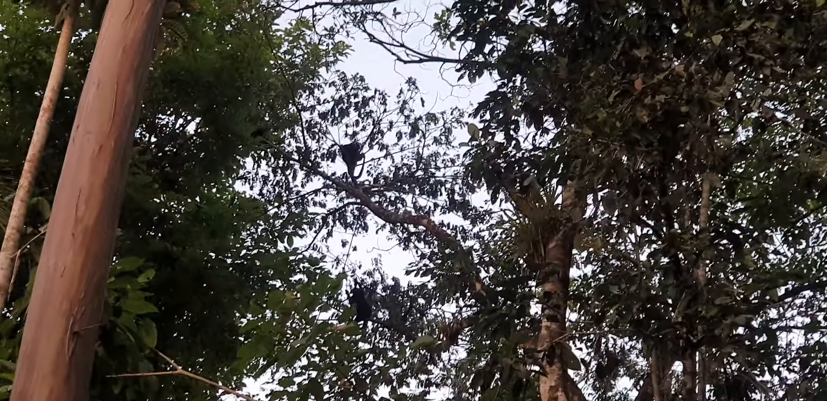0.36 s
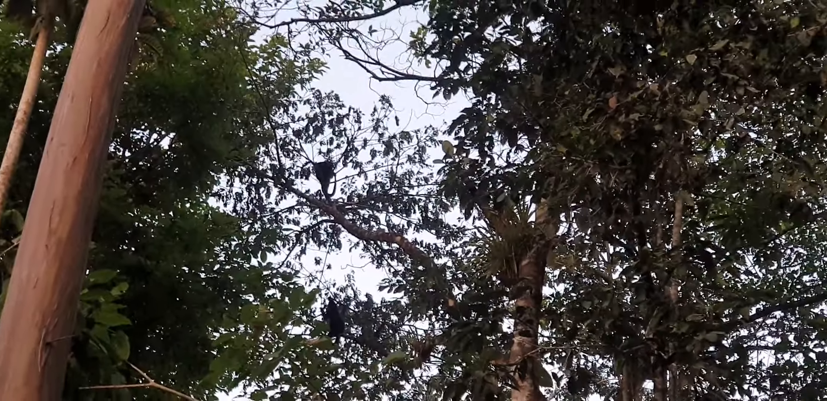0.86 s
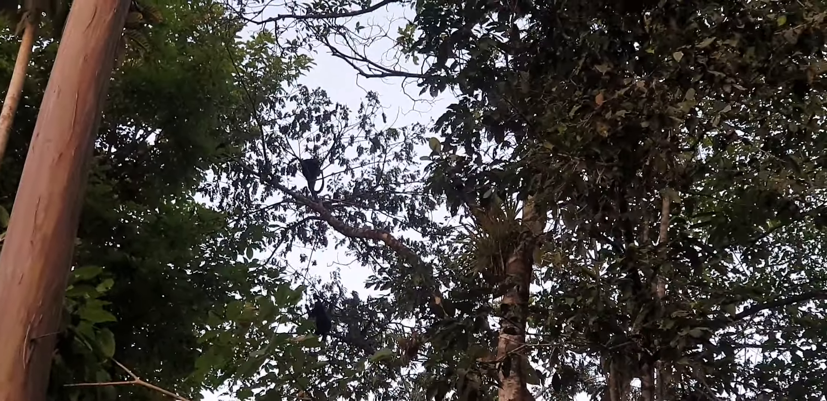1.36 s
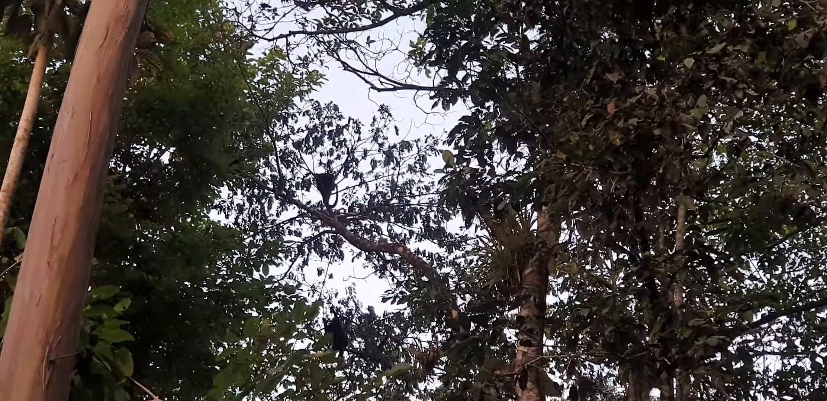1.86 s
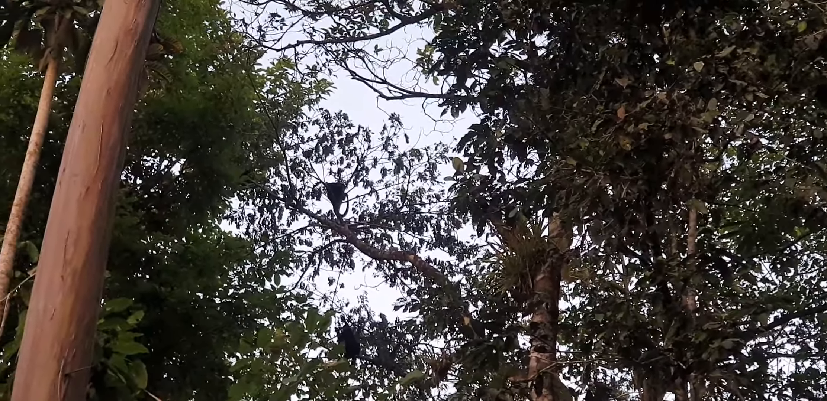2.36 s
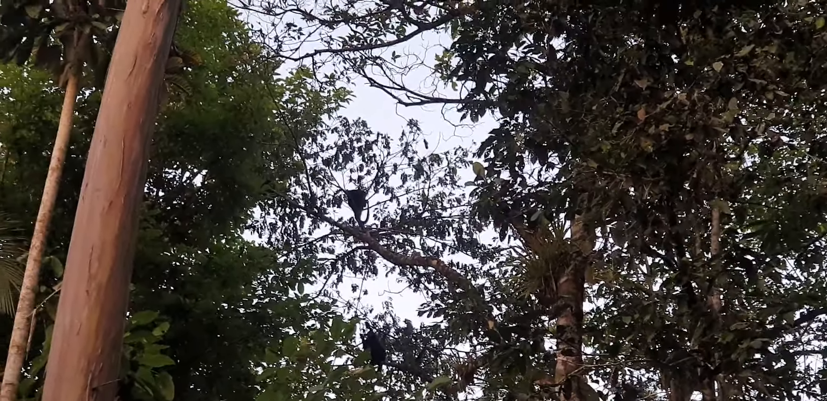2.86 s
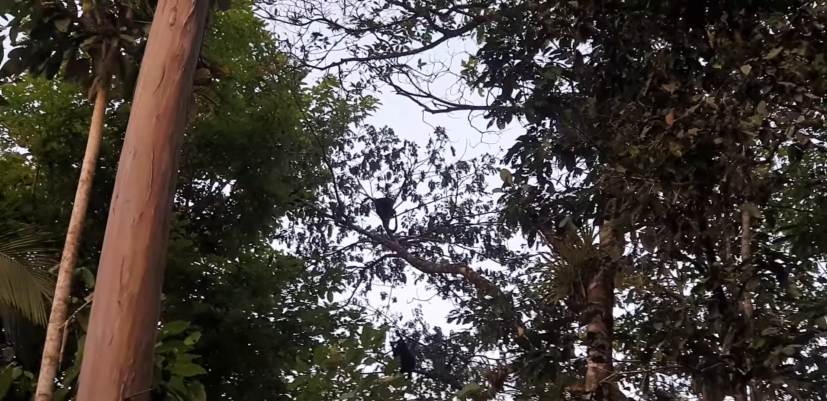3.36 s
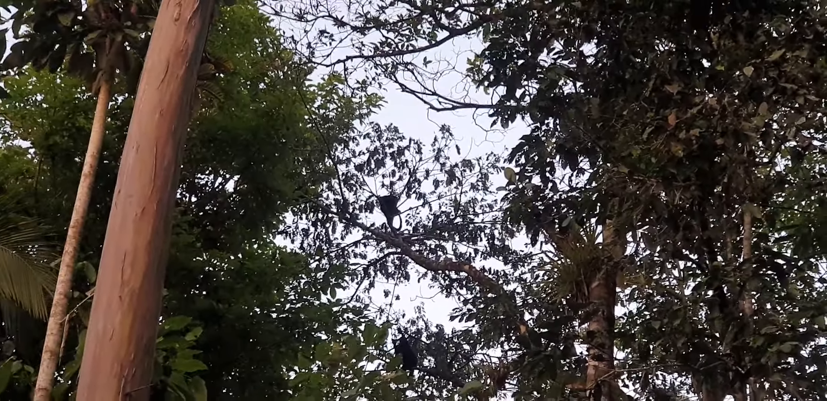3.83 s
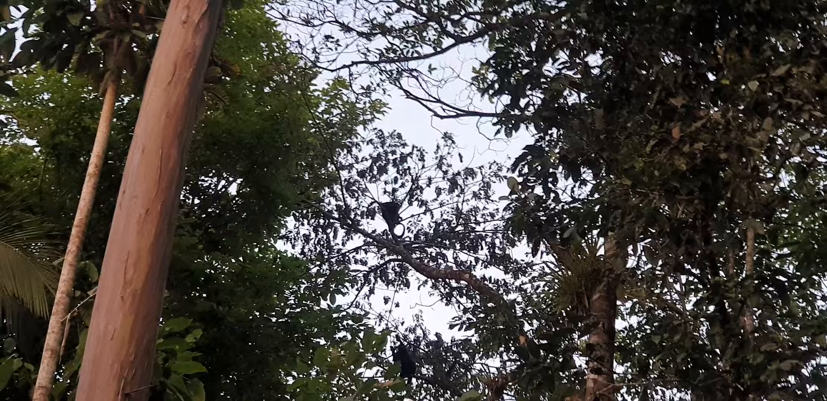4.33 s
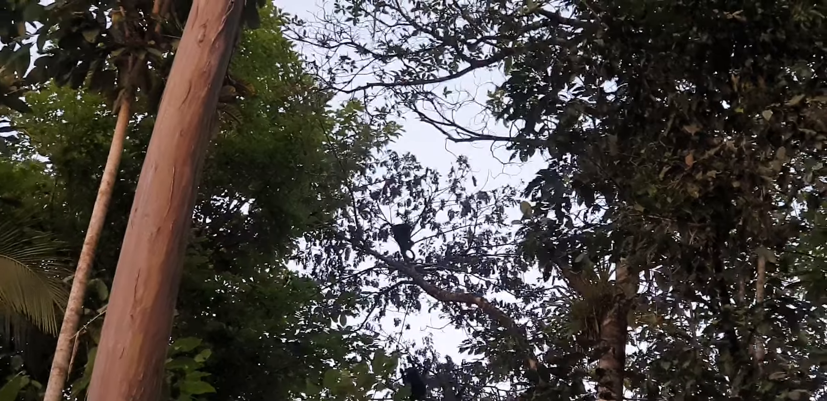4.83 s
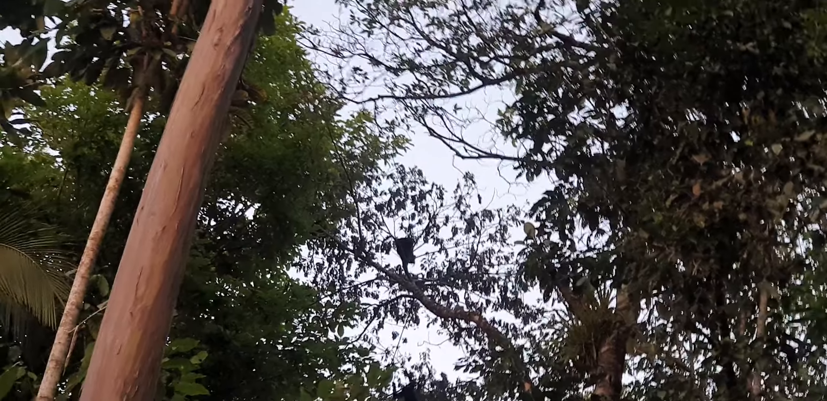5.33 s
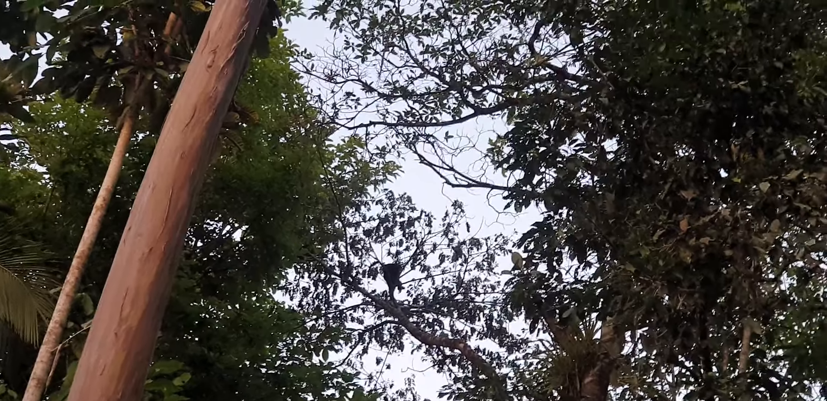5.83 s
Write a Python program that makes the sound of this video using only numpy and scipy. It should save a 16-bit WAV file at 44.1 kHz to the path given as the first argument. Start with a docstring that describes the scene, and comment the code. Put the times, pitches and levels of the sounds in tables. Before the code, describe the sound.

Shrill cicadas drone without pause over soft low forest noise, with brief insect rasps in the first three seconds. A far motor hums low and dull thumps recur. Distant birds whistle and chirp faintly, echoing among the trees, mostly left. Around four and a half seconds a finger rubs the microphone case and knocks sharply, very close and only on the left, then the calm drone continues.

```python
"""Forest by day

Cicadas and katydids drone as stroke-gated noise bands over the noise of the forest floor; insects rasp briefly.
A distant motor hums in harmonic orders, with slow dull thumps that ring two low modes.
Far birds whistle and chatter as gliding sines in the decaying-noise echo of the trees. A finger slips (grainy
noise) and raps (short pushes that ring case modes) on the case beside the left microphone."""
import sys
import numpy as np
from scipy import signal
from scipy.io import wavfile
from scipy.ndimage import uniform_filter1d, map_coordinates

SR = 44100
rng = np.random.default_rng(int(sys.argv[2]) if len(sys.argv) > 2 else 0)


def pcm_store(signal):
    """Save signal as 16-bit PCM."""
    levels = np.round(np.clip(np.atleast_2d(signal), -1, 1) * 32767)
    wavfile.write(sys.argv[1], SR, levels.astype(np.int16).T)


def makeup_ratio(level_db):
    """Linear amplitude ratio for a level in decibels (20 dB per factor of ten)."""
    decades = np.asarray(level_db, float) / 20
    return 10 ** decades


N = 273420  # length in samples


def unit(x):
    """Normalisation to an rms value of 1."""
    return x / np.sqrt(np.mean(x ** 2) + 1e-20)


def along(points, hz):
    """Interpolation of (f/Hz, value) points on a logarithmic frequency axis."""
    f, value = np.transpose(points)
    return np.interp(np.log(hz + 1), np.log(f + 1), value)


def curves(rows):
    """Linear interpolation in time: one value per sample for each column after t/s."""
    s, *columns = np.transpose(rows)
    return [np.interp(np.arange(N) / SR, s, column) for column in columns]


def wobble(rate):
    """Band-limited fluctuation: a smooth random curve through `rate` knots a second."""
    knots = rng.standard_normal(int(N * rate / SR) + 4)
    return map_coordinates(knots, [np.arange(N) * rate / SR])


def sides(db):
    """Interchannel level difference: left and right gains for a left-over-right value in dB."""
    return np.array([makeup_ratio(db / 2), makeup_ratio(-db / 2)])


# Left-right balance of all stereo noise: f/Hz, left over right level/dB
NOISE_BALANCE = [(60, 4), (200, 8), (380, 2.5), (700, 10.5), (2400, 2.5), (4400, 2.5), (6000, 2.5),
                 (10000, 7), (15000, .5)]


def rush(spectrum, alike, patchy_db):
    """Partially coherent noise: two independent noises mixed to a set correlation, rms 1, with random patches."""
    hz, _, z = signal.stft(rng.standard_normal((2, N)), SR, nperseg=2048)
    patches = uniform_filter1d(rng.standard_normal(z.shape[1:]), 12, 0)  # across frequency
    patches = unit(uniform_filter1d(patches, 3, 1))  # across time
    turn = np.arccos(np.clip(along(alike, hz), -1, 1))[:, None] / 2
    mid = z[0] * np.cos(turn)
    side = z[1] * np.sin(turn)
    gain = makeup_ratio(along(spectrum, hz)[:, None] + patchy_db * patches)
    pair = np.array([mid + side, mid - side]) * gain
    pair = pair * sides(along(NOISE_BALANCE, hz))[..., None]
    return unit(signal.istft(pair, SR, nperseg=2048)[1][:, :N])


def strokes(rate, sharp):
    """Periodic modulation: a gate that opens once per wing or tymbal stroke, rate in Hz."""
    phase = 2 * np.pi * np.cumsum(rate) / SR + rng.uniform(0, 2 * np.pi)
    return np.exp(sharp * (np.cos(phase) - 1))


# Forest floor noise: t/s, level/dB
FLOOR_LEVEL = [(0, -60), (1.9, -60), (2.6, -57), (3.4, -57.5), (3.95, -51.5), (4.7, -54.5), (5.3, -56.5),
               (6.2, -59)]
# Its spectral shape: f/Hz, relative density level/dB per Hz
FLOOR_SPECTRUM = [(15, -51.5), (25, -17), (37, -17), (64, -4.5), (91, -7.5), (111, -6.5), (135, -18),
                  (184, -18.5), (219, -21.5), (311, -24.5), (422, -18.5), (1230, -40), (2040, -40),
                  (4210, -49.5), (4700, -46.5), (6110, -85.5), (10300, -120)]
# Its interchannel correlation before balance: f/Hz, left-right likeness (0 to 1)
FLOOR_LIKENESS = [(60, 0.84), (110, 1), (200, 1), (400, 0.41), (700, 0.81), (1300, 0)]


def forest_floor():
    """Diffuse-field noise: the two channels agree at low frequencies and are independent at high ones."""
    level_db = curves(FLOOR_LEVEL)[0] + 0.8 * wobble(3)
    return makeup_ratio(level_db) * rush(FLOOR_SPECTRUM, FLOOR_LIKENESS, patchy_db=1.1)


# Insect chorus, quieter and more central once the hand has shifted: t/s, cicada relative level/dB,
# cicada relative left-right difference/dB, broad chorus relative level/dB, katydid relative level/dB
CHORUS_LEVELS = [(0, -55.5, 8.5, -61.5, -68), (.5, -54.5, 8.5, -61.5, -68.5), (2.8, -55, 9, -61, -66.5),
                 (4.4, -54.5, 5.5, -62, -70), (4.8, -56.5, 4, -63.5, -69.5), (6.2, -56, 4.5, -65, -65)]
# Spectral shapes of the three bands: f/Hz, relative density level/dB per Hz
CICADA_SPECTRUM = [(4180, -33), (7100, -14), (7310, -8.5), (7670, 6), (7980, 7.5), (8280, -1.5),
                   (8700, -40), (11300, -49), (19100, -120)]
BROAD_SPECTRUM = [(4300, -60.5), (4800, -22), (5300, -8.5), (5800, 2), (6400, 0.5), (7200, -2),
                  (8500, -22.5), (9000, -13.5), (10100, -4), (10900, -13), (12000, -17), (14000, -20),
                  (15700, -17), (15900, -58.5)]
KATYDID_SPECTRUM = [(11500, -36.5), (13000, -14), (14300, -5), (15000, -0.5), (15700, 0.5), (15900, -46)]


def insects():
    """Incoherent summation: many singers merge into noise bands; the nearest leave their stroke rate on it."""
    cicada_db, pan_db, broad_db, katydid_db = curves(CHORUS_LEVELS)
    apart = [(1000, 0.013)]  # f/Hz, left-right likeness

    buzz = 1 + 0.5 * strokes(100 + 4 * wobble(2.3), sharp=0.5)
    buzz = buzz + 0.5 * strokes(148 + 5 * wobble(2.7), sharp=1.0)
    cicadas = unit(buzz * rush(CICADA_SPECTRUM, apart, patchy_db=-0.67))
    cicadas = makeup_ratio(cicada_db + 2.0 + 0.33 * wobble(24)) * sides(pan_db - 5.5) * cicadas

    broad = makeup_ratio(broad_db + 4.0 + 0.4 * wobble(6)) * rush(BROAD_SPECTRUM, apart, patchy_db=2.0)

    chirr = 0.5 + strokes(23 + 0.15 * wobble(2), sharp=2.2) * makeup_ratio(1.5 * wobble(5))
    chirr = chirr + 0.6 * strokes(47 + 1.5 * wobble(2), sharp=2.2)
    katydids = unit(chirr * rush(KATYDID_SPECTRUM, apart, patchy_db=1.5))
    return cicadas + broad + makeup_ratio(katydid_db + 0.3) * katydids


# Insect rasps: t/s, length/s, relative level/dB
RASP_EVENTS = [(.97, 0.3, -60), (1.775, 0.28, -60), (2.18, 0.16, -62), (2.56, 0.26, -59)]
# Their spectral shape: f/Hz, relative density level/dB per Hz
RASP_SPECTRUM = [(4350, -46.5), (4650, -10), (4850, 8), (5200, 6), (5900, 3.5), (6500, -42.5)]


def rasps():
    """Amplitude modulation: a noise band pulsed by strokes, starting sharply and fading."""
    t = np.arange(N) / SR
    gate = np.zeros(N)
    for s, length, db in RASP_EVENTS:
        fade_db = 8 * (t - s).clip(0, 1) / length  # 8 dB over each rasp
        ramps = np.minimum((t - s) / 0.017, (s + length - t) / 0.08)
        gate += makeup_ratio(db - fade_db) * np.clip(ramps, 0, 1)
    pulses = 1.8 + strokes(np.full(N, 60), sharp=1.1)
    return gate * unit(pulses * rush(RASP_SPECTRUM, [(1000, 0.11)], patchy_db=4.5))


# Motor: t/s, firing f/Hz, fundamental level/dB, fifth-order level/dB (before waver and balance)
MOTOR_COURSE = [(0, 84, -56, -93), (1, 84.5, -52.5, -75.5), (2.1, 88.4, -51.5, -64.5),
                (3.43, 88.3, -55.5, -65), (3.56, 91.57, -56, -72), (4.35, 91.7, -52.5, -77.5),
                (4.7, 86.9, -52, -66), (6.2, 86.8, -56.5, -74.5)]
# Its other orders: multiple of the firing frequency, level/dB re the fundamental
MOTOR_ORDERS = [(1.5, -20.5), (2, -19), (3, -25), (4, -24), (6, -30.5), (10, -33)]


def motor():
    """Harmonic synthesis: firing orders of a far motor, each wavering on the way through the air."""
    hz, low_db, fifth_db = curves(MOTOR_COURSE)
    phase = 2 * np.pi * np.cumsum(hz + 0.6 * wobble(8)) / SR

    def tone(order, db, waver_db):
        """One sinusoidal order with random level and phase fluctuation."""
        level = np.sqrt(2) * makeup_ratio(db + waver_db * wobble(14))  # rms to peak
        return level * np.sin(order * phase + 0.25 * wobble(10))

    hum = tone(1, low_db, 0.89) + tone(5, fifth_db, 2.5)
    for order, db in MOTOR_ORDERS:
        hum = hum + tone(order, low_db + db, 4.1)
    return hum * sides(3.2)[:, None]


# Dull thumps: t/s, lower-mode relative level/dB, upper mode over lower/dB
THUMP_EVENTS = [(.07, -44.5, 6), (0.518, -40, -3), (.92, -41, 2.5), (1.486, -37.5, -7), (2.951, -38, -0.5),
                (3.666, -52, 12.5), (3.741, -33.5, -4.5), (4.098, -33, -4), (4.49, -30.5, -1.5),
                (4.91, -37, 1), (5.3, -37, 3), (5.698, -40, 3)]
# Their two modes: f/Hz, 60 dB decay time/s (before the swell)
THUMP_RESONANCES = [(150, 0.11), (245, 0.099)]


def thumps():
    """Modal decay: each soft far blow swells and rings two low modes."""
    out = np.zeros(N + SR)
    t = np.arange(SR // 4) / SR
    swell = 1 - np.exp(-t / 0.017)
    phases = rng.uniform(size=(len(THUMP_EVENTS), 2))  # in turns
    for (s, db, upper_db), turns in zip(THUMP_EVENTS, phases):
        ring = np.zeros(len(t))
        for (hz, t60), level, turn in zip(THUMP_RESONANCES, (db, db + upper_db), turns):
            ring += makeup_ratio(level - 60 * t / t60) * np.sin(2 * np.pi * (hz * t + turn))
        out[round(s * SR):][:len(t)] += ring * swell
    return out[:N] * sides(3.5)[:, None]


# Swooping whistles: t/s, length/s, relative level/dB
WHISTLE_EVENTS = [(1.14, .65, -63.5), (3.85, .64, -62.5), (4.4, .6, -64)]
# Course of one whistle: share of its length, f/Hz, relative level/dB
WHISTLE_COURSE = [(0, 2450, -8), (.04, 2380, 1), (.18, 2200, 0), (.36, 2080, -3), (.5, 2280, -9),
                  (.68, 2650, -10), (.83, 2880, -10), (.93, 2890, -14), (1, 2880, -26)]
# Hoarse calls and clearer notes (the rows at 1.035 s and 5.913 s are tonal glides of insect rasps): t/s,
# length/s, start f/Hz, end f/Hz, relative level/dB
HOARSE_CALLS = [(0.346, 0.14, 3670, 3550, -77), (0.451, 0.18, 2607, 2610, -67.5),
                (0.553, 0.23, 2660, 3190, -69.5), (1.035, 0.14, 4610, 4500, -67.5),
                (1.094, 0.095, 1580, 1573, -74), (1.894, 0.12, 2303, 2180, -70.5),
                (2.17, 0.086, 8600, 8700, -65), (2.281, 0.16, 3387, 3275, -67.5),
                (3.17, 0.15, 1787, 1710, -71), (3.624, 0.45, 3096, 3054, -68.5),
                (3.651, 0.49, 1670, 1720, -74.5), (5.301, 0.25, 2759, 2600, -66.5),
                (5.447, 0.2, 2765, 2580, -92)]
CLEAR_NOTES = [(0.057, 0.079, 1660, 1570, -74), (0.136, 0.14, 1986, 2070, -75.5),
               (0.358, 0.092, 1900, 1880, -76.5), (0.805, 0.36, 1884, 2142, -76),
               (1.405, 0.24, 2106, 2088, -72), (1.75, 0.045, 1540, 1550, -72),
               (2.626, 0.18, 2370, 2300, -75.5), (2.85, 0.17, 2070, 2010, -78.5),
               (3.16, .1, 3570, 3480, -76.5), (3.33, 0.11, 2130, 2150, -77), (3.501, 0.2, 2800, 2815, -73),
               (3.647, .3, 2764, 2622, -63.5), (3.75, .15, 4380, 4420, -78), (4.125, 0.14, 2140, 2095, -72),
               (4.256, 0.066, 966, 974, -65), (4.34, .1, 2880, 3300, -74.5),
               (5.229, 0.088, 2430, 2750, -74.5), (5.308, .2, 2764, 2563, -63.5),
               (5.913, 0.12, 4790, 4800, -75.5)]
# Echo of the trees: f/Hz, 60 dB decay time/s
TREE_DECAY = [(1000, 1), (3000, 0.62), (9000, .4)]


def birds():
    """Frequency modulation and reverberation: gliding, warbled sines, direct and through the echo of the trees."""
    t = np.arange(N) / SR
    song = np.zeros(N)
    for s, length, level_db in WHISTLE_EVENTS:
        hz, db = curves([(s + share * length, *shape) for share, *shape in WHISTLE_COURSE])
        sounding = (t > s) & (t < s + length)
        level = sounding * makeup_ratio(level_db + db + 2.5 * wobble(60))
        song += level * np.sin(2 * np.pi * np.cumsum(hz + 30 * wobble(200)) / SR)

    warble, flutter = wobble(300), wobble(50)
    # the last column is the depth of the quick random warble in Hz: wide sounds hoarse, narrow sounds clear
    calls = [(*row, 183) for row in HOARSE_CALLS] + [(*row, 45.7) for row in CLEAR_NOTES]
    for s, length, start_hz, end_hz, db, warble_hz in calls:
        at = slice(round(s * SR), round((s + length) * SR))
        share = (t[at] - s) / length
        hz = start_hz + (end_hz - start_hz) * share + warble_hz * warble[at]
        swell = np.sqrt(np.abs(np.sin(np.pi * share)))
        song[at] += makeup_ratio(db + 2.0 * flutter[at]) * swell * np.sin(2 * np.pi * np.cumsum(hz) / SR)

    # echo: noise decaying faster in the treble, independent left and right
    hz, lag, z = signal.stft(rng.standard_normal((2, SR // 2)), SR, nperseg=256)
    decay = makeup_ratio(-60 * lag / along(TREE_DECAY, hz)[:, None])
    tail = signal.istft(z * decay, SR, nperseg=256)[1]
    echo = signal.fftconvolve(song[None], tail / np.linalg.norm(tail[0]), axes=1)[:, :N]
    return (makeup_ratio(-4.5) * song + makeup_ratio(-4.0) * echo) * sides(13.0)[:, None]


def near_left():
    """Proximity: full level at the near left microphone, -39 dB at the far right one."""
    return makeup_ratio(np.array([[0], [-39]]))


# Skin sliding: t/s, level/dB at the near microphone
RUB_LEVEL = [(4.3, -91), (4.44, -55), (4.5, -55), (4.58, -57.5), (4.63, -45), (4.665, -44), (4.68, -64),
             (4.725, -46.5), (4.75, -72), (4.88, -82)]
# Its spectral shape: f/Hz, relative density level/dB per Hz
SKIN_SPECTRUM = [(150, -20), (400, -7.5), (1200, -9.5), (2500, -10.5), (4000, -11), (6500, -13.5),
                 (12000, -19), (16000, -50)]


def rub():
    """Stick-slip friction: skin drags over the case in grainy little slips."""
    grain_db = 3 * wobble(400)
    slips = makeup_ratio(grain_db) * rush(SKIN_SPECTRUM, [(1000, 0.8)], patchy_db=0.8)[0]
    return makeup_ratio(curves(RUB_LEVEL)[0]) * unit(slips) * near_left()


# Contacts on the case: t/s, push peak level/dB (before the port), contact time/ms, ring level/dB re the push
RAP_EVENTS = [(4.092, -38, 0.38, -5), (4.408, -40, 0.23, -15), (4.436, -24, 5.5, -7),
              (4.448, -20.5, 5.1, -6), (4.4699, -18, 0.23, -19), (4.536, -30.5, 0.13, -10),
              (4.553, -25.5, 4.4, -7), (4.566, -18.5, 0.2, -7.5), (4.585, -20, 0.14, -20.5),
              (4.614, -23.5, .12, -19.5), (4.6393, 3.5, 0.28, -4.5), (4.6661, -13.5, 0.22, 0),
              (4.6673, 0, 0.37, -17.5), (4.6688, -7.5, 0.52, -9.5), (4.6702, 3.5, 0.22, -12.5),
              (4.6727, -3.5, 2.3, 5.5), (4.7247, -6, 0.26, -1.5), (4.7554, -11, 0.61, 8.5),
              (5.418, -34.5, .2, -23)]
# Case modes: f/Hz, 60 dB decay time/s, relative level/dB
CASE_MODES = [(110, .06, -21), (340, 0.015, -5), (670, 0.005, -13.5), (1500, 0.0023, -11.5),
              (3900, .004, -4.5)]
# Band of a knock that passes through the case: lower and upper cutoff f/Hz
PORT_BAND = [70.5, 10400]


def raps():
    """Impact excitation: each contact pushes the diaphragm inward, and that push rings the case modes."""
    out = np.zeros((2, N + SR))
    t = np.arange(SR // 10) / SR
    spreads_db = rng.normal(0, 1.5, (len(RAP_EVENTS), len(CASE_MODES)))
    for (s, db, contact_ms, ring_db), spread in zip(RAP_EVENTS, spreads_db):
        push = np.sin(np.pi * np.clip(t * 1000 / contact_ms, 0, 1)) ** 2
        modes = np.zeros(len(t))
        for (hz, t60, level), change_db in zip(CASE_MODES, spread):
            modes += makeup_ratio(level + change_db - 60 * t / t60) * np.sin(2 * np.pi * hz * t)
        # a long contact mutes the high modes
        ring = np.convolve(modes, push[:SR // 200] / (push.sum() + 1e-9))[:len(t)]
        knock = makeup_ratio(db) * (makeup_ratio(ring_db) * ring - push)
        out[:, round(s * SR):][:, :len(t)] += knock * near_left()
    return signal.lfilter(*signal.butter(1, PORT_BAND, 'band', fs=SR), out[:, :N])


def scene():
    """Linear superposition of all sources."""
    background = forest_floor() + insects() + rasps() + motor() + thumps()
    return background + birds() + rub() + raps()


def low_pass(x):
    """Removes everything above the highest recorded frequency."""
    return signal.sosfilt(signal.butter(12, 17010, fs=SR, output="sos"), x)


def record(dry):
    """The finished mix is passed on at unchanged level through a low-pass that ends the treble near 17 kHz."""
    return low_pass(dry)


dry = scene()
out = record(dry)
pcm_store(out)
```